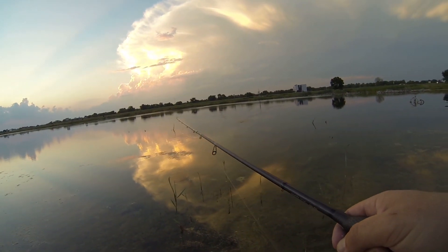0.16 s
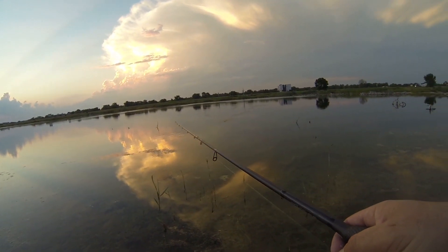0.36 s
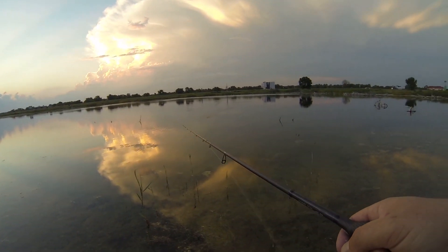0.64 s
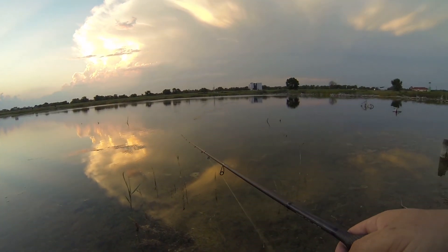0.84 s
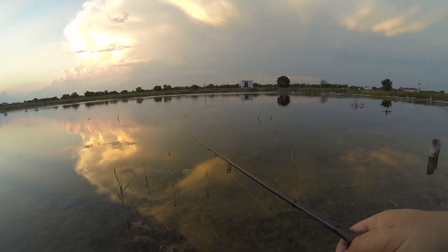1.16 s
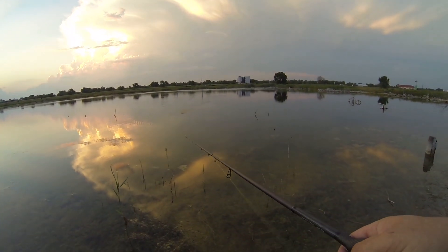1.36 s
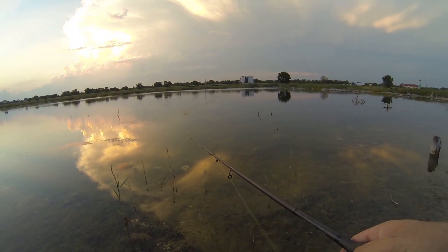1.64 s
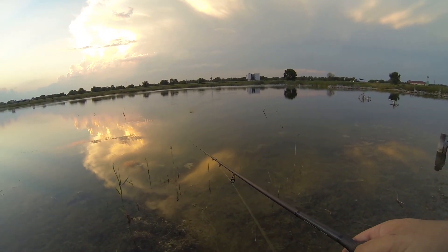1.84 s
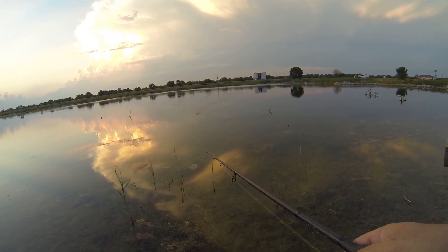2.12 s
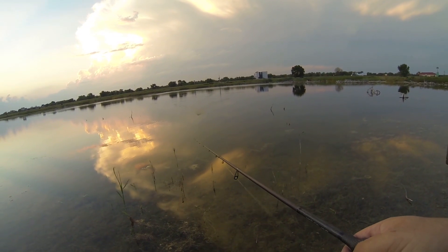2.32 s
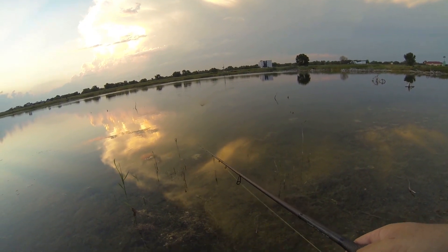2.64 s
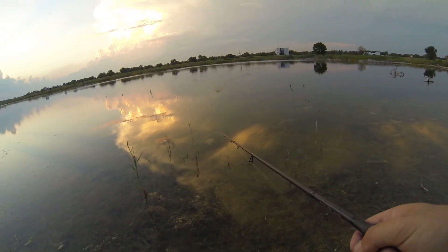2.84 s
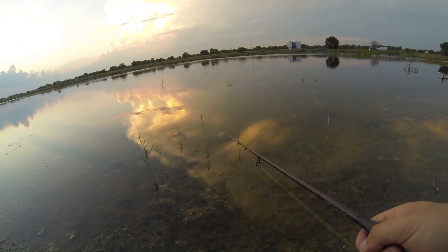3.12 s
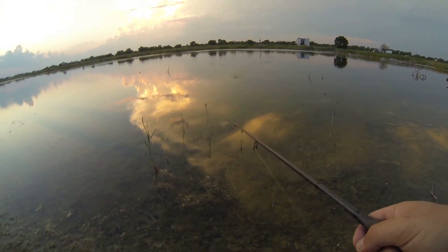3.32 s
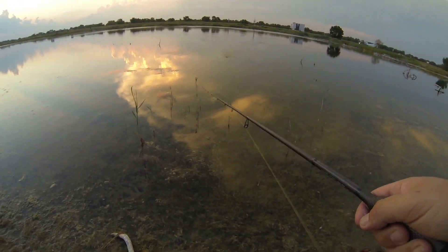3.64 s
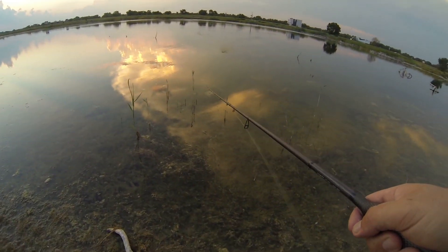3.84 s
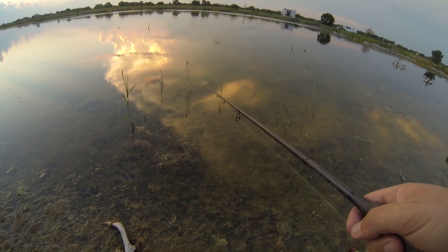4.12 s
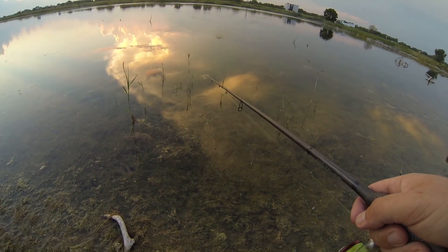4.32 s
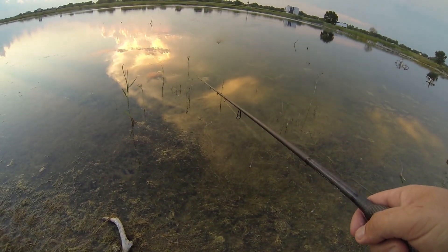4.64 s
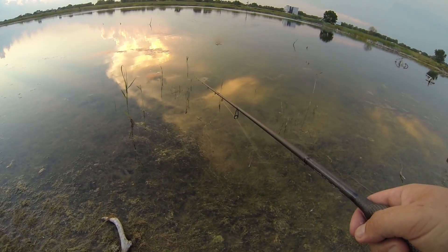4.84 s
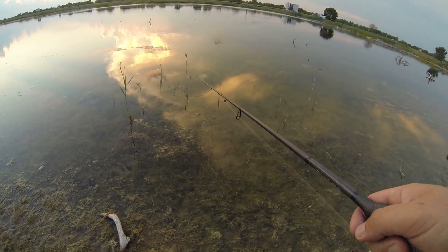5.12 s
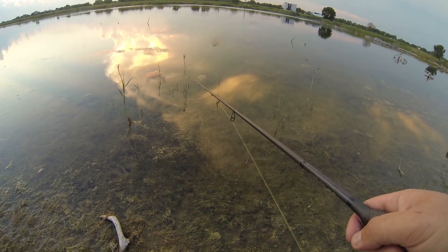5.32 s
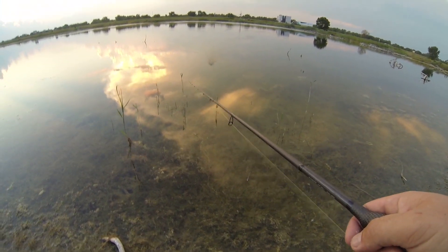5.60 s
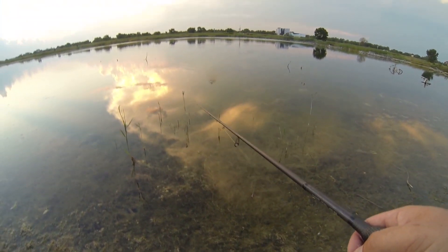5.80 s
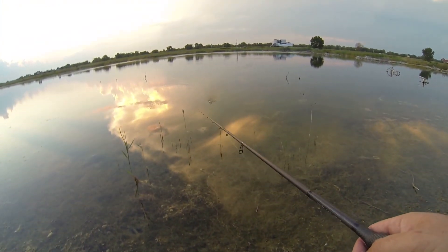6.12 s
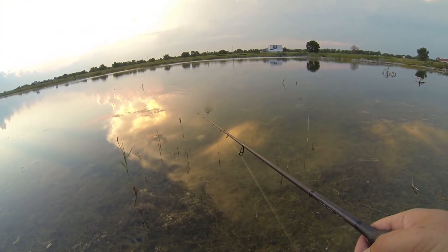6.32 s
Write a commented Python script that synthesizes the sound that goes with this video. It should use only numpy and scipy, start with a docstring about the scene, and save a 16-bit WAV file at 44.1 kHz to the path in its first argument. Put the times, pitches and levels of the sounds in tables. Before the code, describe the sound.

Outdoors beside a calm pond, a distant highway gives a continuous deep rumble and soft tyre roar, swelling gently as groups of vehicles pass. Faint crickets chirp irregularly over a thin high insect shimmer. Close to the microphone, a fishing rod ticks lightly, a sleeve brushes, and small bubbles plop near two seconds, just before four and near the end. The roar turns hollower midway as the microphone tips toward the water.

```python
"""Evening by a still pond, with a far highway

A far highway rumbles across the water: shaped noise for engines and tyres, wavering tones for drones and treads.
Crickets and other insects call faintly from the bank as gliding tones and narrow noise; bubbles plop as rising
notes, fishing tackle ticks as ringing noise bursts, and a sleeve brushes as grainy noise. The angler's camera,
with a faint buzz of its own, tips toward the water for a while, which changes the colour of the roar."""
import sys
import numpy as np
from scipy import signal
from scipy.fft import rfft, irfft, next_fast_len
from scipy.io import wavfile
from scipy.ndimage import uniform_filter1d

SR = 44100
rng = np.random.default_rng(int(sys.argv[2]) if len(sys.argv) > 2 else 0)


def wav_out(sig):
    """Save sig, one row per channel (or a flat mono array), as 16-bit PCM at SR to the path in sys.argv[1]."""
    wavfile.write(sys.argv[1], SR, np.round(np.clip(np.atleast_2d(sig).T, -1, 1) * 32767).astype(np.int16))


N = 284886
TIME = np.arange(N) / SR


def undb(db):
    """Decibels to gain."""
    return 10 ** (np.asarray(db) / 20)


def level(x, db):
    """Scale to an rms level in dB."""
    return x * undb(db) / np.sqrt(np.mean(x ** 2))


def add(out, start_s, x):
    """Mix a short sound in at start_s, cut off at the end of the scene."""
    i = max(int(start_s * SR), 0)
    part = x[:max(N - i, 0)]
    out[i:i + len(part)] += part


def bell(centre_s, length_s):
    """A smooth rise and fall around centre_s; peak 1."""
    return np.exp(-2 * ((TIME - centre_s) / length_s) ** 2)


def walk(rate_hz):
    """Random modulation: new levels rate_hz times a second, smoothed twice into slopes; rms 1."""
    hold = int(SR / rate_hz)
    held = np.repeat(rng.standard_normal(N // hold + 1), hold)
    smooth = uniform_filter1d(uniform_filter1d(held, hold), hold)
    return level(smooth[:N], 0)


def noise(colour):
    """Noise with the spectrum of a (Hz, dB) table, falling 60 dB per octave past both ends; rms 1."""
    size = next_fast_len(N)
    octave = np.log2(np.maximum(np.fft.rfftfreq(size, 1 / SR), 1))
    hz, db = np.transpose(colour)
    corners = np.log2(hz)
    outside = np.abs(octave - np.clip(octave, corners[0], corners[-1]))
    gain = undb(np.interp(octave, corners, db) - 60 * outside)
    return level(irfft(rfft(rng.standard_normal(size)) * gain, size)[:N], 0)


def glide(start_hz, end_hz, length_s, bend=1, overtone=0):
    """A short tone that swells and fades as its pitch slides; a bend above 1 saves the slide for late."""
    u = np.linspace(0, 1, max(int(length_s * SR), 8))
    hz = start_hz + (end_hz - start_hz) * u ** bend
    phase = 2 * np.pi * np.cumsum(hz) / SR
    return np.sin(np.pi * u) * (np.sin(phase) + overtone * np.sin(2 * phase))


def beat(first_s, period_s, count, slowing_s):
    """Times of repeated calls, each gap longer than the last by slowing_s."""
    gaps = period_s + slowing_s * np.arange(count - 1)
    return first_s + np.append(0, np.cumsum(gaps))


def microphone_tilt():
    """How far the microphone is tipped toward the water, 0-1, in straight moves."""
    # moves of the microphone: time_s, tilt (0-1)
    tilt_moves = [(0, 0.14), (2.8, 0), (3.7, 1), (5.3, 0.82), (5.8, 0.47), (6.46, 0.46)]
    time_s, tilt = np.transpose(tilt_moves)
    return np.interp(TIME, time_s, tilt)


def electronics(tilt_db=1.5, pip_db=-73, whistle_db=-89.0, frame_hz=59.97):
    """The camera itself: two bursts of buzz in every frame, two steady whistles and four pips a second."""
    # colour of the buzz: frequency_hz, density_db (per Hz)
    buzz_colour = [(9900, -7.5), (10250, 2), (10450, 0), (10750, -6), (11400, -6), (12600, -17)]
    # bursts in every frame: place (0-1 of the frame), length (frames), level_db
    frame_bursts = [(.35, .22, -76.5), (.77, 0.11, -72)]
    frame = TIME * frame_hz % 1
    gate = np.zeros(N)
    for place, length, level_db in frame_bursts:
        gate += undb(level_db) * np.exp(-2 * ((frame - place) / length) ** 2)
    tilt = microphone_tilt()
    out = noise(buzz_colour) * gate * undb(tilt_db * tilt)
    for hz in (10430, 12647):
        out += np.sin(2 * np.pi * hz * TIME) * undb(whistle_db)
    for start_s in np.arange(.093, N / SR, .2502):
        pip_level_db = pip_db + tilt_db * np.interp(start_s, TIME, tilt) + rng.standard_normal()
        add(out, start_s, glide(11300, 10950, length_s=.013) * undb(pip_level_db))
    return out


def chorus(level_db=-72.5, tilt_db=1.5, shimmer_db=1.0, pulse_hz=80, pulse_db=1.0):
    """Far insects merge into a fine, fast-pulsing shimmer, a little stronger with the microphone tipped down."""
    # colour of the far chorus: frequency_hz, density_db (per Hz)
    chorus_colour = [(4700, -6), (5150, 4), (5700, -3), (6300, -8), (7500, -7.5), (9700, -12.5),
                     (10150, -6), (10500, -7), (11400, -9), (13000, -15), (13700, -24), (14900, -24)]
    pulse_rate = pulse_hz * (1 + .063 * walk(18))
    pulsing = np.sin(2 * np.pi * np.cumsum(pulse_rate) / SR)
    swing_db = shimmer_db * walk(260) + pulse_db * pulsing
    return noise(chorus_colour) * undb(level_db + tilt_db * microphone_tilt() + swing_db)


def tree_crickets(level_db=-70, throb_hz=9.5, throb_db=4):
    """Far tree crickets blend into one soft, throbbing note: a narrow noise band with a wandering pulse."""
    # colour of the blended note: frequency_hz, density_db (per Hz)
    note_colour = [(2840, -13), (2930, 0), (3020, -18)]
    throb_rate = throb_hz * (1 + .2 * walk(5))
    throb = np.sin(2 * np.pi * np.cumsum(throb_rate) / SR)
    return level(noise(note_colour) * undb(throb_db * throb), level_db)


def bush_cricket(length_s=.13, strokes_hz=90):
    """Short buzzes on a slow beat, each a high tone chopped into separate, uneven wing strokes."""
    # buzzes: centre_s, level_db
    buzzes = [(.215, -71), (.785, -73), (1.445, -76), (2.025, -72), (2.68, -73), (3.29, -71), (3.855, -69),
              (4.42, -72), (5.02, -72), (5.59, -70), (6.175, -74)]
    out = np.zeros(N)
    for centre_s, level_db in buzzes:
        tuning = 1 + .004 * rng.standard_normal()
        buzz = glide(7900 * tuning, 7950 * tuning, length_s)
        strokes = np.sin(np.pi * strokes_hz * TIME[:len(buzz)]) ** 2
        rasp = strokes * (1 + .4 * walk(450)[:len(buzz)])
        add(out, centre_s - len(buzz) / SR / 2, buzz * rasp * undb(level_db))
    return out


def bank_insects(pulse_s=.019, sag_hz=130, rough=.25):
    """Thin high voices in the grass: lone notes, and a ticking trill that climbs in pitch as it slowly tires."""
    # lone notes: start_s, start_hz, end_hz, length_s, level_db
    lone_notes = [(.2, 8620, 8760, .085, -78), (1.3, 2920, 2970, .032, -55.5),
                  (1.565, 10830, 10980, .095, -70), (1.938, 2960, 2940, .026, -58),
                  (3.06, 8640, 8740, .085, -79)]
    # runs of the trill: first_s (centre of the first pulse), pulses (count), start_hz, end_hz, level_db
    trill_runs = [(.29, 7, 7480, 7500, -78), (2.091, 50, 7570, 7780, -75)]
    out = np.zeros(N)
    for start_s, start_hz, end_hz, length_s, level_db in lone_notes:
        add(out, start_s, glide(start_hz, end_hz, length_s) * undb(level_db))
    for first_s, pulses, start_hz, end_hz, level_db in trill_runs:
        times = beat(first_s, period_s=.062, count=int(pulses), slowing_s=.000062)
        climb = np.sin(np.linspace(0, np.pi / 2, len(times)))
        pitches = start_hz + (end_hz - start_hz) * climb
        for centre_s, hz in zip(times, pitches):
            pulse = glide(hz + sag_hz / 2, hz - sag_hz / 2, pulse_s)
            add(out, centre_s - pulse_s / 2, pulse * undb(level_db))
    return out * (1 + rough * walk(400))


def crickets(stroke_gap_s=.048, near_db=-53, far_db=-65, echo_near_db=-14, echo_far_db=-2, echo_s=.007, rough=.12):
    """Each closing wing holds its tone, then slows so that the tone hooks down; most chirps grow louder.
    Faint callers sit deep in the reeds: their strokes are flatter and arrive blurred by scattering."""
    # chirps: last_s (centre of the last wing stroke), strokes (count), level_db (last stroke), growth_db (per stroke)
    chirps = [(.143, 3, -62, .8), (.365, 2, -51, 6), (.622, 3, -66, 0), (.784, 3, -65, 0),
              (.863, 2, -59, 4), (1.079, 3, -62, 1.5), (1.291, 2, -59.5, 2), (1.322, 2, -64, 1),
              (1.533, 3, -62, 2), (1.711, 3, -64, 1.5), (1.885, 2, -60, 4), (1.947, 1, -66, 0),
              (2.195, 3, -70, 1), (2.332, 3, -62, 2), (2.531, 2, -57, 3), (2.65, 2, -68, 1),
              (2.725, 2, -62, 3), (3.006, 2, -55, 3), (3.147, 3, -64, 0), (3.203, 1, -64, 1.5),
              (3.543, 3, -59, 2.5), (3.618, 2, -52, 2), (3.933, 3, -61.5, 1.5), (4.122, 3, -65, 1.5),
              (4.194, 2, -55, 3.5), (4.27, 1, -66, 0), (4.365, 2, -62, -1), (4.648, 3, -62.5, 1),
              (4.726, 2, -63.5, 3), (4.824, 2, -56, 3), (5.177, 3, -63, 0), (5.206, 3, -65.5, 1),
              (5.379, 2, -53, 2.5), (5.463, 1, -69, -2), (5.605, 3, -59.5, 2.5), (5.831, 2, -65, 2),
              (5.991, 2, -54.5, 3), (6.045, 1, -63.5, -2), (6.236, 2, -67, 0)]
    out, echo_time = np.zeros(N), TIME[:SR // 20]
    for last_s, strokes, level_db, growth_db in chirps:
        far = np.clip((near_db - level_db) / (near_db - far_db), 0, 1)
        echo_db = echo_near_db + far * (echo_far_db - echo_near_db)
        for k in range(int(strokes)):  # backward from the last stroke
            pitch, bend, length = rng.standard_normal(3)
            tuning = 1 + .007 * pitch
            stroke = glide(4600 * tuning, (4160 + 150 * far) * tuning, length_s=.031 + .002 * length,
                           bend=2.1 + .3 * bend, overtone=undb(-24))
            scatter = rng.standard_normal(len(echo_time)) * np.exp(-echo_time / echo_s)
            paths = level(scatter, echo_db) / np.sqrt(len(echo_time))
            paths[0] = 1  # direct sound
            heard = signal.fftconvolve(stroke, paths)
            heard *= np.linalg.norm(stroke) / np.linalg.norm(heard)  # scattering keeps the energy
            start_s = last_s - k * stroke_gap_s - len(stroke) / SR / 2
            add(out, start_s, heard * undb(level_db - k * growth_db))
    return out * (1 + rough * walk(300))


def sleeve(catch_db=1.9, grain_db=4.0):
    """Cloth brushes as the arm moves: a grainy hiss that swells and dies away."""
    # colour of brushing cloth: frequency_hz, density_db (per Hz)
    cloth_colour = [(1400, -13), (2100, 7), (3000, 4), (4000, -5.5), (5500, -17.5), (9500, -28)]
    # soft swishes: centre_s, length_s, level_db
    swishes = [(2.675, .13, -53.5), (2.57, .07, -61), (3.465, 0.08, -53), (3.32, .08, -61),
               (0.14, 0.13, -57), (5.58, 0.048, -63), (6.34, 0.19, -57)]
    swell = sum(undb(level_db) * bell(centre_s, length_s) for centre_s, length_s, level_db in swishes)
    grain = undb(catch_db * walk(70) + grain_db * walk(600))
    return level(noise(cloth_colour) * grain, 0) * swell


def tackle(decay_s=.0011, spread=.075, rod_hz=2950, rod_db=-8, faint_db=-54, faint_snap_db=-1, faint_count=22):
    """Each tick is a thin, broad snap of contact that rings its own spot and the rod.
    Fainter ones come at random times as the hand shifts."""
    # the clearest ticks of rod and line: start_s, ring_hz, ring_db (peak), snap_db (peak)
    clear_ticks = [(.323, 9400, -61, -75), (.785, 2900, -49, -56), (1.021, 3930, -50, -52),
                   (1.3, 9000, -57, -70), (1.333, 9600, -64, -70), (1.367, 5000, -57, -53),
                   (2.716, 9000, -55, -64), (2.945, 7500, -63, -60), (3.931, 4700, -55, -56),
                   (4.088, 7500, -62, -66), (4.223, 3500, -54, -53), (4.376, 5330, -54, -55),
                   (4.757, 3000, -45, -55), (4.974, 3400, -49, -55), (5.077, 2900, -49, -55),
                   (5.118, 5540, -45.5, -54), (5.368, 5200, -55, -62), (5.544, 4800, -57, -54),
                   (5.578, 2600, -47, -50), (5.588, 2980, -49, -51), (6.005, 7000, -61, -66),
                   (6.096, 3300, -49, -56), (6.229, 3200, -47, -50), (6.378, 3150, -46, -52),
                   (1.935, 5200, -57, -42), (6.414, 4570, -47, -44)]
    # edges of the snap's band: low_hz, high_hz
    snap_band = (2300, 5000)
    out, snaps, tick_time = np.zeros(N), np.zeros(N), TIME[:SR // 50]
    faint_ticks = []
    for a, b, c in rng.random((faint_count, 3)):
        faint_ticks.append((a * N / SR, 2200 + 1500 * b, faint_db + 6 * (c - b), faint_db + faint_snap_db - 6 * b))
    for start_s, ring_hz, ring_db, snap_db in [*clear_ticks, *faint_ticks]:
        contact = rng.standard_normal(len(tick_time)) * np.exp(-tick_time / decay_s)
        for centre_hz, peak_db in [(ring_hz, ring_db), (rod_hz, ring_db + rod_db)]:
            edges = [centre_hz / (1 + spread), centre_hz * (1 + spread)]
            band = signal.butter(1, edges, "band", fs=SR, output="sos")
            ring = signal.sosfilt(np.vstack([band, band, band]), contact)
            add(out, start_s, ring / np.abs(ring).max() * undb(peak_db))
        add(snaps, start_s, undb([snap_db]))
    snap_filter = signal.butter(3, snap_band, "band", fs=SR, output="sos")
    snap = signal.sosfilt(snap_filter, signal.unit_impulse(len(tick_time)))
    return out + signal.fftconvolve(snaps, snap / np.abs(snap).max())[:N]


def water():
    """A bubble's note rises as it reaches the surface."""
    # bubbles: start_s, start_hz, end_hz, length_s, level_db (peak)
    plops = [(1.995, 950, 1100, 0.0054, -28.5), (2.01, 510, 605, 0.0068, -31),
             (3.756, 1320, 1500, 0.014, -46), (3.796, 876, 1070, 0.029, -33),
             (3.852, 620, 735, 0.01, -30.5), (4.21, 1440, 1650, 0.0081, -42),
             (4.991, 1290, 1490, 0.0097, -41), (5.551, 1100, 1500, .012, -39),
             (6.243, 1950, 2250, .008, -45), (6.324, 696, 1140, 0.013, -33.5),
             (6.101, 450, 1850, 0.015, -31.5)]
    out = np.zeros(N)
    for start_s, start_hz, end_hz, length_s, level_db in plops:
        add(out, start_s, glide(start_hz, end_hz, length_s) * undb(level_db))
    return out


def vehicles(settle=2.3, wander=.004, fading_db=1.0):
    """Single engines and treads swell out of the roar as wavering tones; most sink in pitch and settle."""
    # drones and tread whines: start_s, end_s, start_hz, end_hz, width_hz, steady (power share 0-1),
    # level_db (before the swell)
    vehicle_tones = [(-1.5, 8.97, 84.5, 83.8, 7, .3, -40), (2, 5, 392, 386, 34, .05, -49.5),
                     (4.5, 7.6, 382, 386, 52, .03, -49.3), (-.05, 1.85, 795, 708, 16, .62, -49.8),
                     (2.2, 2.6, 778, 772, 28, .2, -52), (3.2, 4.5, 780, 780, 44, .05, -49),
                     (3.5, 5.45, 940, 924, 32, .3, -48.7), (3.5, 4.25, 700, 620, 220, 0, -45.5),
                     (5.6, 6.25, 1145, 1135, 30, .25, -52.5)]
    out = np.zeros(N)
    for start_s, end_s, start_hz, end_hz, width_hz, steady, level_db in vehicle_tones:
        u = np.clip((TIME - start_s) / (end_s - start_s), 0, 1)
        hz = (end_hz + (start_hz - end_hz) * (1 - u) ** settle) * (1 + wander * walk(9))
        phase = 2 * np.pi * np.cumsum(hz) / SR
        # the direct path holds the tone; many other paths over the water blur it
        blurred = walk(2 * width_hz) * np.cos(phase) + walk(2 * width_hz) * np.sin(phase)
        tone = np.sqrt(2 * steady) * np.cos(phase) + np.sqrt(1 - steady) * blurred
        swell = np.sqrt(np.abs(np.sin(np.pi * u)))
        out += level(tone * undb(fading_db * walk(12)), level_db) * swell
    return out


def passing():
    """Power of roar, growl and hiss from the passing bunches: it falls with the square of their distance."""
    # bunches of vehicles: nearest_s, half_s (time to half power), roar_db, growl_db, hiss_db
    passes = [(.35, 1.12, -41.5, -52.5, -59.5), (2.2, 1.03, -46.5, -59.5, -64.5),
              (3.7, 0.49, -43.5, -55, -62), (6.15, 0.75, -43.5, -46.5, -62.5)]
    powers = np.zeros((3, N))
    for nearest_s, half_s, roar_db, growl_db, hiss_db in passes:
        nearness = 1 / (1 + ((TIME - nearest_s) / half_s) ** 2)
        powers += np.outer(undb([roar_db, growl_db, hiss_db]) ** 2, nearness)
    return powers


def highway(tipped_trim_db=.32, waver_db=.88, fade_db_per_s=.33):
    """Engines rumble and growl below, tyres roar and hiss above; moving air makes all but the rumble waver."""
    # colours of the four layers, the roar with the microphone level and tipped: frequency_hz, density_db (per Hz)
    rumble_colour, growl_colour, hiss_colour = [(8.8, -39), (15, -6), (43, 1.5), (75, -1), (92, -5),
                                                (110, -9.5), (160, -11.5), (190, -15), (250, -36),
                                                (420, -120)], [(180, -3), (240, 1), (340, -7)], [(2200, 4), (2600, 1),
                                                                               (2920, -0.5), (3150, -1.5),
                                                                               (4100, -8.5), (4800, -16),
                                                                               (6300, -25), (9500, -33)]
    roar_colour, tipped_colour = [(330, -4.5), (450, -3), (600, -2.5), (780, -1.5), (1000, -1.5),
                                  (1150, -2), (1350, -10.5), (1750, -9), (2000, -15), (2300, -26.5)], [(330, -4.5), (420, -3), (560, -4), (780, -1), (1000, -3.5),
                                                (1200, -11), (1520, -14.5), (1920, -11), (2100, -18.5),
                                                (2300, -45)]
    # a brief swell of the deep rumble: centre_s, length_s, rise_db
    rumble_swell = (3.36, 0.12, 3.2)
    # the steady stream of traffic; the rumble fades from its starting level
    rumble_start_db, growl_db, roar_db, hiss_db = -32, -52, -46.5, -63.5
    roar_power, growl_power, hiss_power = passing()
    centre_s, length_s, rise_db = rumble_swell
    rumble_db = rumble_start_db - fade_db_per_s * TIME + rise_db * bell(centre_s, length_s)
    rumble = noise(rumble_colour) * undb(rumble_db)
    growl = noise(growl_colour) * np.sqrt(undb(growl_db) ** 2 + growl_power) * undb(waver_db * walk(7.4))
    # equal-power crossfade: facing the water, the roar is hollower above a kilohertz
    angle = np.pi / 2 * microphone_tilt()
    roar = np.cos(angle) * noise(roar_colour) + np.sin(angle) * noise(tipped_colour) * undb(tipped_trim_db)
    roar = roar * np.sqrt(undb(roar_db) ** 2 + roar_power) * undb(waver_db * walk(24.07))
    hiss = noise(hiss_colour) * np.sqrt(undb(hiss_db) ** 2 + hiss_power) * undb(waver_db * walk(23.85))
    return rumble + growl + roar + hiss


def scene():
    """Everything reaches one microphone in the open air."""
    insects = chorus() + tree_crickets() + bush_cricket() + bank_insects() + crickets()
    angler = electronics() + sleeve() + tackle()
    return (insects + angler + water() + vehicles() + highway())[None]


def record(dry, top_hz=14950, ease_s=.004):
    """The camera cuts the top steeply; the sound eases in and out over a few milliseconds."""
    edges = np.clip(np.minimum(TIME, TIME[-1] - TIME) / ease_s, 0, 1)
    low_pass = signal.ellip(10, .2, 70, top_hz, fs=SR, output="sos")
    return signal.sosfilt(low_pass, dry * edges)


dry = scene()
out = record(dry)
wav_out(out)
```